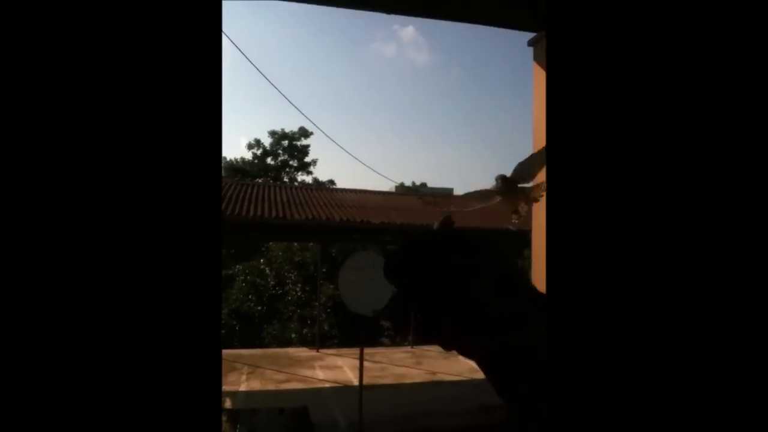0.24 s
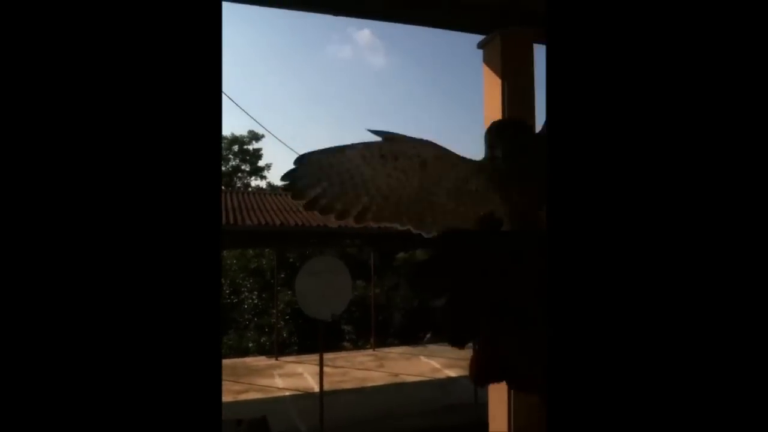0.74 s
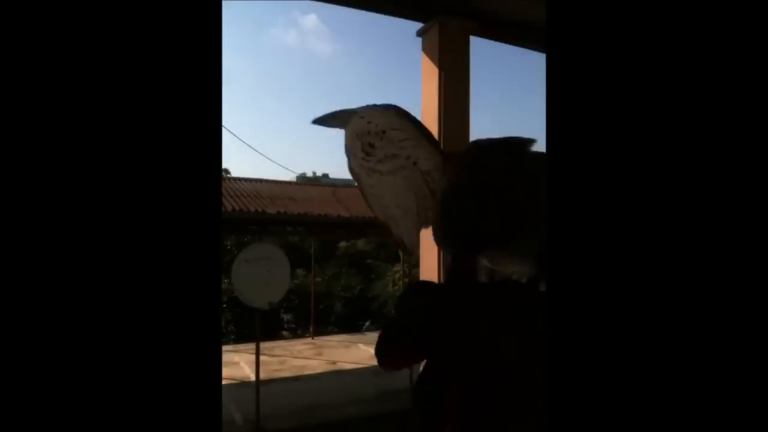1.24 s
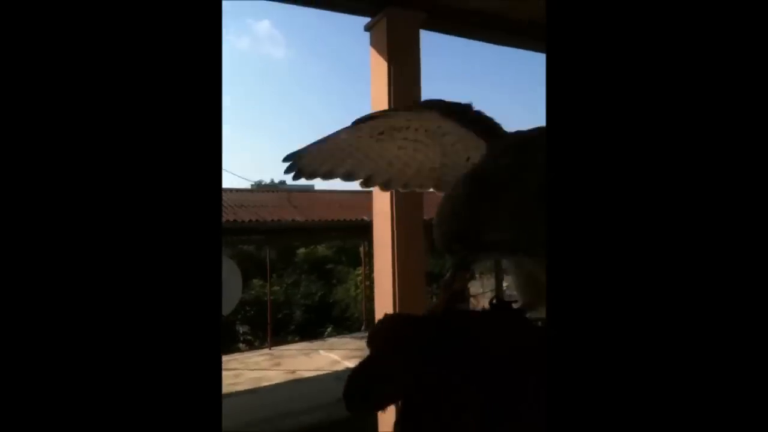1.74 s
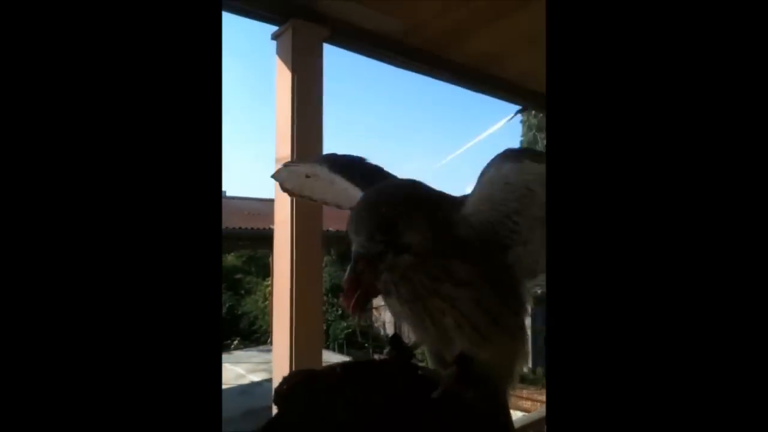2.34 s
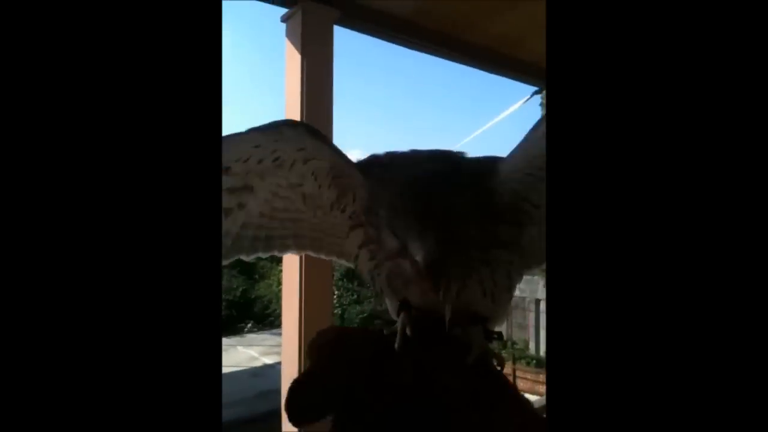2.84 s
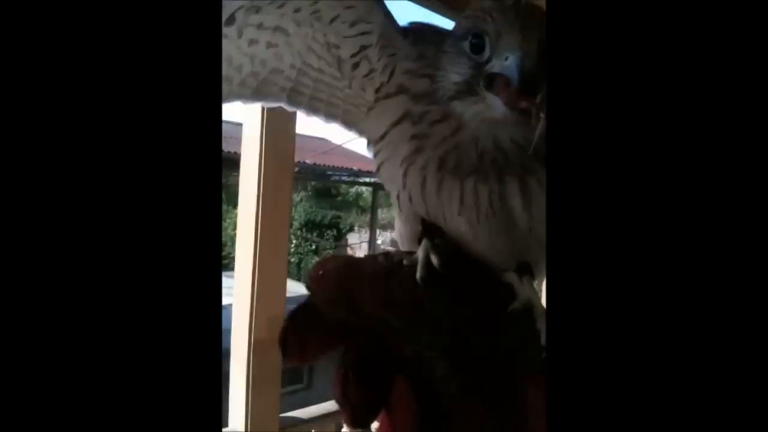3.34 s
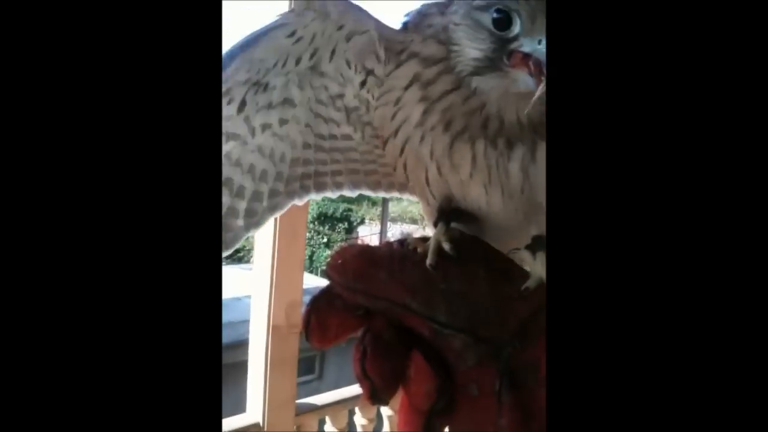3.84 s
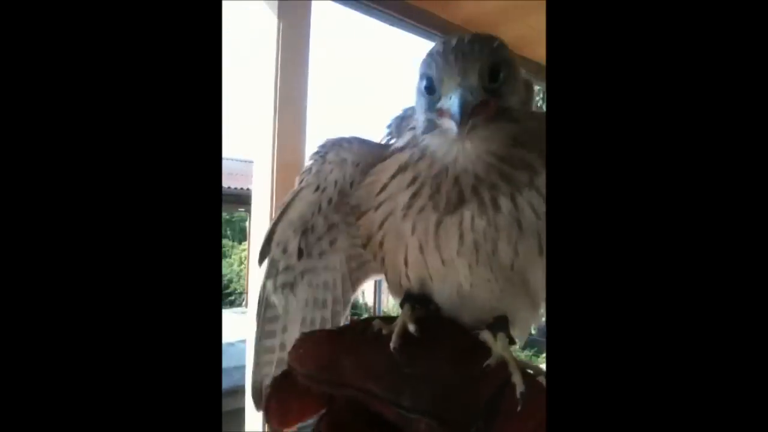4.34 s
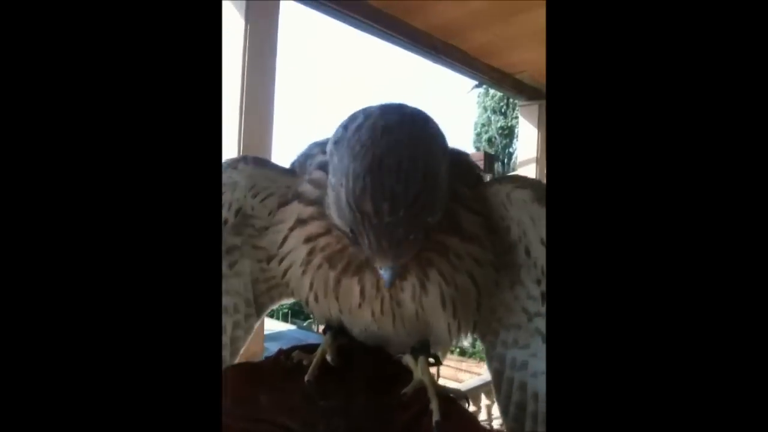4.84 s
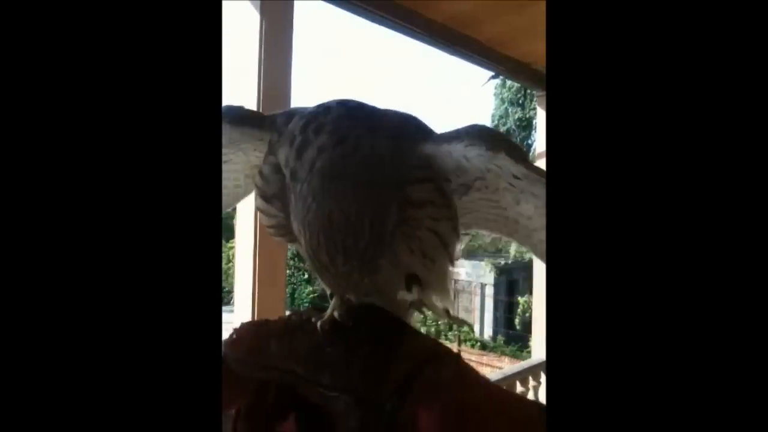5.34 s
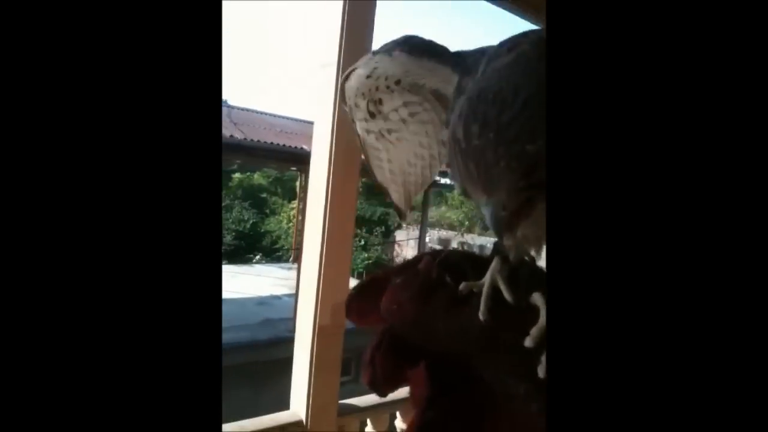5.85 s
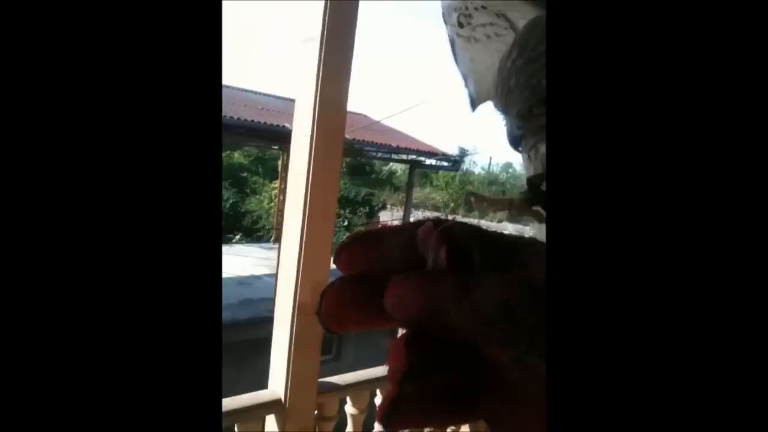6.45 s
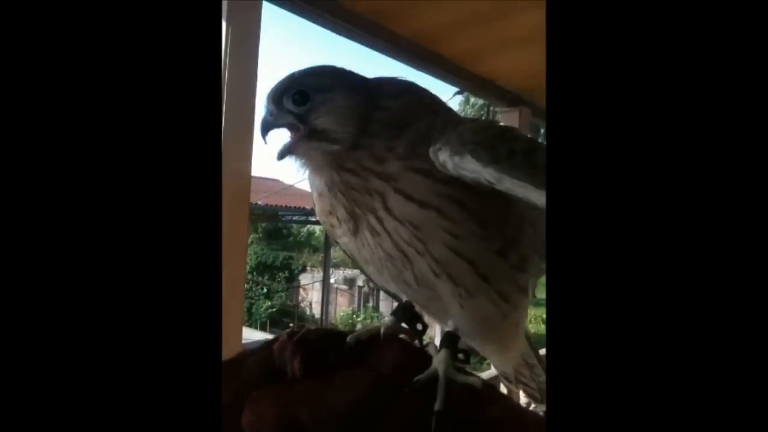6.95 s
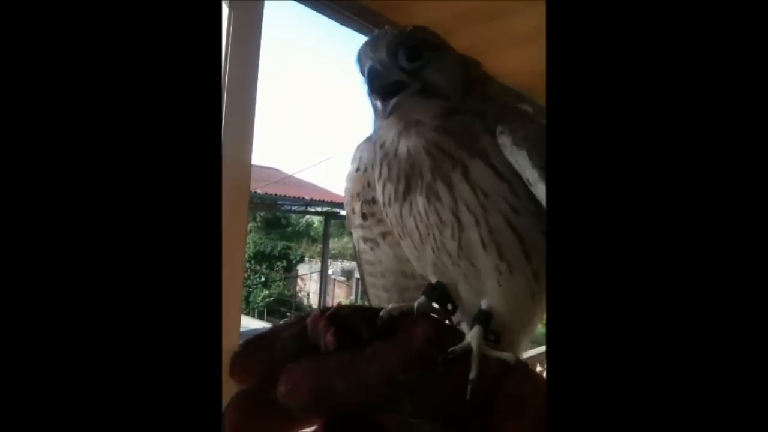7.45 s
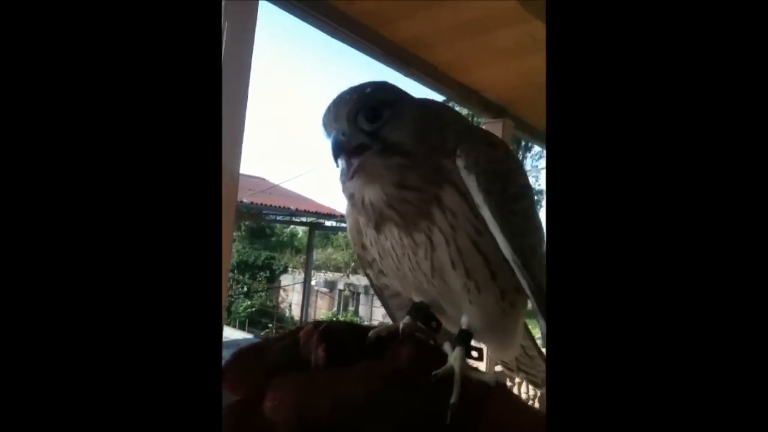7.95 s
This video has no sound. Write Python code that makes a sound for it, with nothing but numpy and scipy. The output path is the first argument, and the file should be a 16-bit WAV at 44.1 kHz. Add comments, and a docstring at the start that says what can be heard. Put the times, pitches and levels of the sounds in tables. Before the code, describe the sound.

From the start a young kestrel calls in quick runs of shrill, raspy yelps, about eighteen to twenty a second, each run lasting a fraction of a second with tiny gaps. The first half second is weaker; from 0.7 to 2.1 s the yelps are loudest, piercing and gritty, dropping in pitch onto each note. From 2.2 to 3.2 s they weaken and roughen, with small ticks near 2.3 and 2.7 s. Then come scattered squeals and thin whines, one brighter yelp at 3.6 s, and low wing thumps on the close microphone, strongest around 3.8 s. Feathers rustle softly. From 4.7 to 7.8 s a faint hoarse call repeats far away roughly every 0.4 s over quiet outdoor air, with low breeze around 5.5 to 6.3 s and sparse faint squeaks, including a falling-away whine at 7.5 s. Sharp, clear, loud yelps burst out from 8.05 s to the end. The porch adds short reflections.

```python
"""Scolding young kestrel

A young kestrel on a gloved hand under a porch roof flaps and scolds in fast shrill runs, then calms to single squeals.
The two sides of its syrinx, a high and a low oscillator, sound together and mix, with a rasp of ragged partials and hiss.
Wing draught is low noise that swells in gusts, feathers rustle as softer noise, beak and talons tick as short bursts,
and a faint hoarse call of shaped noise repeats far away over quiet outdoor air."""
import sys
import numpy as np
from scipy import signal
from scipy.fft import rfft, irfft, next_fast_len
from scipy.io import wavfile

SR = 44100
rng = np.random.default_rng(int(sys.argv[2]) if len(sys.argv) > 2 else 0)


def master_out(mix):
    """Clip the mix to full scale and print it as 16-bit PCM to the path in sys.argv[1]."""
    frames = np.transpose(np.atleast_2d(mix))
    ceiling = np.clip(frames, -1, 1)
    pcm = np.round(ceiling * 32767).astype(np.int16)
    wavfile.write(sys.argv[1], SR, pcm)


N = 361162
T = np.arange(N) / SR  # time in seconds

# Levels of the sources in these tables are relative: filters and trims follow.
# Runs of calling, one push of air each. Each row: start in seconds, end in seconds, whistle in Hz and low voice
# in Hz (both before their bends), effort in dB, strength of the low voice in dB.
CALLING_RUNS = [(-.03, 0.122, 5760, 2383, -41.5, -7.5), (0.192, 0.328, 6170, 2440, -42.5, -8),
                (0.377, 0.603, 6620, 2420, -41, -7), (.647, 1.116, 7180, 2610, -35.5, -7),
                (1.188, 1.49, 7003, 2552, -34.5, -17.5), (1.576, 1.875, 6780, 2578, -38, -31.5),
                (1.969, 2.212, 6824, 2580, -39, -7), (2.3, 2.608, 6280, 2400, -40, -3),
                (2.709, 2.944, 6240, 2248, -45.5, 3.5), (2.976, 3.185, 5633, 2156, -51.5, 6),
                (3.331, 3.437, 8100, 2216, -50.5, 5.5), (3.561, 3.666, 8360, 2660, -50, -3.5),
                (3.812, 3.887, 5570, 2600, -47, -7.5), (4.099, 4.157, 4440, 2227, -45, -21),
                (8.132, 8.214, 6930, 2330, -42, -18)]
# Loud notes that drop from the whistle onto a held pitch. Each row: start in seconds, end in seconds, entry pitch
# in Hz, held pitch in Hz, level in dB, rasp in dB.
YELP_NOTES = [ (0.062, 0.117, 4820, 4826, -36, -0.5), (0.256, .305, 5400, 5040, -32.5, -8),
              (.409, 0.438, 4500, 4620, -37, -14.5), (0.466, 0.516, 4660, 3920, -32.5, -14.5),
              (0.53, 0.559, 5130, 3880, -31, -6.5), (0.555, 0.586, 4500, 4540, -32, -6),
              (.729, 0.754, 5220, 4204, -22, -22), (0.783, 0.813, 5070, 5024, -18, -15),
              (0.84, 0.859, 4810, 4900, -23, -5.5), (0.893, 0.919, 4765, 5140, -21.5, -4.5),
              (0.952, 0.968, 6400, 3956, -16.5, -18), (1.009, 1.034, 5980, 3400, -27.5, -5),
              (1.058, 1.08, 6800, 3996, -13.5, -1), (1.213, 1.244, 5180, 3620, -29.5, -0.5),
              (1.263, 1.294, 6400, 3500, -21.5, -16.5), (1.314, 1.351, 6420, 3464, -21.5, -4.5),
              (1.37, 1.403, 6670, 3420, -21.5, -14), (1.427, 1.458, 7340, 3670, -20, -15.5),
              (1.605, 1.629, 5587, 4325, -26, -11.5), (1.658, 1.681, 7020, 3770, -18.5, -23),
              (1.711, 1.744, 6640, 3653, -21, -17), (1.768, 1.803, 6170, 3480, -22.5, -18),
              (1.824, 1.867, 5910, 3374, -23, -12), (1.994, 2.019, 3780, 3620, -40, -0.5),
              (2.051, 2.082, 5830, 3560, -20, -16), (2.107, 2.13, 4760, 3775, -28, 4),
              (2.439, 2.494, 4310, 4770, -38.5, 2.5), (2.503, 2.53, 5360, 4340, -31, 5),
              (3.574, 3.613, 5340, 5320, -28, -16), (8.063, 8.082, 4390, 4076, -20, -54.5),
              (8.107, 8.144, 4900, 4076, -14.5, -29), (8.167, 8.203, 4600, 4045, -18, -31)]
# Short gliding notes of one voice. Each row: start in seconds, end in seconds, first, middle and last pitch in Hz,
# level in dB, octave in dB before its tilt, rasp in dB.
SQUEAL_NOTES = [ (1.093, 1.119, 4314, 3445, 1410, -29.5, -5, 9),
                (1.467, 1.491, 3705, 2844, 1451, -34, 4, 10.5),
                (1.861, 1.88, 3467, 2452, 1037, -33, -3.5, 3.5),
                (2.176, 2.216, 6200, 5440, 4300, -31, -1, -7),
                (2.585, 2.623, 4810, 4020, 3120, -30, -10.5, -5),
                (2.74, 2.792, 2990, 3083, 2900, -40.5, -12, -5),
                (2.795, 2.865, 4380, 4460, 4570, -43, -16, -27),
                (2.797, 2.83, 1880, 1925, 1974, -43.5, -14, -20),
                (2.898, 2.941, 2826, 2760, 2650, -36, -4, -3.5),
                (3.05, 3.103, 1998, 2238, 2280, -46.5, -1, 0.5),
                (3.106, 3.159, 5400, 4830, 4460, -35, -7, -1),
                (3.148, 3.179, 2500, 2554, 2220, -33.5, -11, -8),
                (3.351, 3.372, 4300, 4100, 3900, -61, 18.5, 10.5),
                (3.427, 3.453, 4400, 4280, 4030, -55.5, 18, -8),
                (3.579, 3.603, 7820, 8050, 7860, -28.5, -30, -23),
                (3.656, 3.685, 4600, 4050, 3300, -54.5, 9, -8),
                (3.892, 3.912, 4460, 3976, 3330, -41.5, -16, -14),
                (3.975, 4.013, 5500, 5660, 5970, -59.5, 5.5, -9.5),
                (4.084, 4.122, 3820, 4160, 4490, -31.5, -9.5, -14.5),
                (4.138, 4.174, 860, 768, 755, -39, -12.5, -15),
                (4.429, 4.464, 3820, 4160, 4130, -54, -28, -14),
                (4.614, 4.674, 3160, 3660, 3570, -49, -14, -26),
                (5.378, 5.413, 1702, 1910, 1696, -44.5, -5.5, -22.5),
                (5.742, 5.83, 1610, 1894, 1906, -57.5, -1, -2),
                (5.806, 5.865, 3940, 4200, 3350, -52, -18, -3.5),
                (6.105, 6.152, 2177, 1943, 2055, -44.5, -4, -20),
                (6.156, 6.171, 3230, 3200, 3150, -57, -24, -30),
                (6.648, 6.67, 1880, 2130, 1925, -45.5, -2, -4),
                (7.604, 7.659, 3820, 4140, 5370, -63.5, -25, -23.5),
                (7.718, 7.747, 4530, 3750, 2590, -66, -21, -16),
                (7.819, 7.834, 5740, 6000, 5950, -49, -36, -24),
                (7.824, 7.869, 4300, 3990, 3400, -66, -22, -17),
                (8.032, 8.041, 1880, 2086, 2100, -46, 3, -15),
                (8.043, 8.074, 5220, 5294, 5230, -31, -14, -26.5),
                (8.079, 8.117, 5500, 5810, 5370, -25.5, -28, -32),
                (8.143, 8.177, 5540, 5580, 5220, -26.5, -28, -12.5)]
# Drawn-out clear whines. Each row: start in seconds, end in seconds, held pitch in Hz, opening overshoot as a share,
# closing rise as a share, level in dB, level change over the note in dB, octave in dB.
WHINE_NOTES = [(3.441, 3.574, 3890, 0.16, 0.39, -46.5, -5, -8),
               (4.01, 4.09, 3210, 0.24, 0.3, -60.5, 12, -10.5),
               (4.474, 4.561, 3203, 0.19, 0.056, -52, 0, -17.5),
               (5.958, 6.044, 2900, 0.15, 0.093, -40, -10, -7), (6.641, 6.693, 3040, .1, 0, -50.5, 4, -9.5),
               (7.449, 7.612, 3510, 0.047, 0.15, -45.5, -13, -16.5)]
# Spectrum of the rasp. Each row: frequency in Hz, level in dB.
RASP_COLOUR = [(900, -5.5), (2000, -6.5), (3200, -7), (4500, 4), (6300, -3.5), (8000, -4), (10000, -10.5),
               (12000, -20.5), (16000, -12.5)]
# Level of the voice's treble, highest while the bird faces the microphone. Each row: time in seconds, gain in dB.
TREBLE_GAIN = [(.5, -5.5), (1.5, -4.5), (3.3, 2.5), (6.2, -2.5), (8.1, -5.5)]
# Beak and talon ticks. Each row: time in seconds, level in dB.
TICK_BLOWS = [(2.3017, -23.5), (2.7125, -23), (3.977, -40), (4.4928, -39), (4.6793, -39), (5.9617, -46),
              (6.6363, -37), (6.7506, -43.5), (7.8163, -40.5), (8.0244, -33)]
# Sound sent to the walls, greatest while the bird is farthest away. Each row: time in seconds, gain in dB.
ECHO_SEND = [(.5, 8), (1.3, -2.5), (2.2, 1), (4, 0)]
# Gusts from the wings on the microphone. Each row: start in seconds, length in seconds, level in dB.
WING_GUSTS = [(2.32, 0.13, -45), (2.67, 0.085, -48.5), (2.79, 0.25, -46.5), (3.06, 0.17, -45.5),
              (3.315, 0.086, -38), (3.59, 0.17, -35.5), (3.812, 0.099, -27), (3.88, 0.23, -41.5),
              (4.64, 0.18, -40.5), (5.485, 0.071, -36), (5.66, 0.12, -52.5), (6.51, 0.078, -46),
              (7.55, 0.083, -43.5)]
# Light breeze between the gusts. Each row: time in seconds, level in dB.
BREEZE_LEVEL = [(0.0, -69), (3.67, -63), (3.81, -41), (4.17, -59), (4.7, -62.5), (5.45, -45), (6.32, -46),
                (7.14, -63.5), (8.19, -46)]
# Spectrum of the air thumping on the microphone. Each row: frequency in Hz, level in dB.
BUFFET_COLOUR = [(18, -70), (30, -38), (54, -31), (121, -3), (167, 2.5), (282, -5), (526, -22.5),
                 (1500, -48.5), (1950, -73), (3300, -120)]
# Spells of feathers sliding over each other. Each row: start in seconds, length in seconds, level in dB.
FEATHER_RUSTLES = [(-0.7, 5.8, -62), (5.55, 0.88, -66.5), (5.5, 0.74, -65), (6.7, 0.18, -65.5)]
# Onsets of the distant calls. Each entry: time in seconds.
FAR_CALL_TIMES = [4.70, 5.12, 5.50, 5.87, 6.248, 6.62, 7.00, 7.38, 7.748]
# Spectrum of the distant call. Each row: frequency in Hz, level in dB.
FAR_CALL_COLOUR = [(400, -51), (680, -20), (830, 4.5), (1000, -17), (1200, -8.5), (1600, -15.5),
                   (2200, -22.5), (2800, -53), (5000, -43)]
# Spectrum of the outdoor air. Each row: frequency in Hz, level in dB.
YARD_COLOUR = [(30, -36), (60, -25.5), (150, -7), (600, -13), (820, -7), (2000, -16), (3000, -37.5),
               (6500, -31), (8080, -22), (10000, -55.5), (16000, -47.5)]

SCOOP, SCOOP_S = 0.42, 0.011  # a run starts flat by this share and closes in with this time constant
SLUMP, SLUMP_S = 0.37, 0.019  # it falls by this share, with this time constant, as the air runs out
SURGE_DB, SURGE_SAG = 6.5, 0.15  # each yelp swells the effort and pulls the whistle down by this share
RECOVER_S = 0.012  # then both recover in this time
LOW_BEND = 0.36  # exponent: how far the low voice follows scoop and slump
THROB_HZ, THROB_DB = 19.2, 2  # the air comes in quick pushes, counted from the start of each run
SPLIT_HZ = 1340  # a pressed yelp splits into a whole fraction of its pitch near this one
GUST_ATTACK, GUST_RELEASE = 0.3, 0.64  # shares of a gust's or rustle's length
STILL_FEATHERS_DB = -74.5
YARD_DB = -66.5
TOP_HZ = 15850


def undb(db):
    """Decibels to gain."""
    return 10 ** (np.asarray(db) / 20)


def over_time(points):
    """Straight lines through (time, value) points."""
    return np.interp(T, *np.transpose(points))


def noise(colour):
    """Noise of rms 1 with a spectrum of (Hz, dB) points."""
    hz, db = np.transpose(colour)
    size = next_fast_len(N)
    bins = np.maximum(np.arange(size // 2 + 1) * SR / size, 1)
    gain = undb(np.interp(np.log(bins), np.log(hz), db))
    x = irfft(rfft(rng.standard_normal(size)) * gain, size)[:N]
    return x / x.std()


def walk(rate):
    """Smooth chance of spread 1 that heads for a new random value rate times a second."""
    x = np.interp(T * rate, np.arange(N // 4), rng.standard_normal(N // 4))
    return x / x.std()


def turn(hz):
    """Phase of an oscillator that follows a pitch curve."""
    return 2 * np.pi * np.cumsum(hz) / SR


def span(start, end, attack, release):
    """Samples of a note, its progress 0-1 and its swell; attack and release are shares of its length."""
    i = np.flatnonzero((T >= start) & (T < end))
    u = (T[i] - start) / (end - start)
    rise = np.sin(np.pi / 2 * np.minimum(u / attack, 1)) ** 2
    fall = np.sin(np.pi / 2 * np.minimum((1 - u) / release, 1)) ** 2
    return i, u, rise * fall


def kestrel(throat_hz=1600, beam_hz=8500):
    """All of the voice, through a short throat that radiates little bass and beams its treble forward."""
    low_hz = low_pitch()
    rasp = chaos(low_hz)
    shaky_hz = low_hz * (1 + 0.033 * walk(900))
    voice = runs(shaky_hz, rasp) + yelps(shaky_hz, rasp) + squeals(rasp) + whines()
    beam = signal.butter(2, beam_hz, "high", fs=SR, output="sos")
    treble = signal.sosfiltfilt(beam, voice)
    voice = voice + (undb(over_time(TREBLE_GAIN)) - 1) * treble
    throat = signal.butter(2, throat_hz, "high", fs=SR, output="sos")
    return signal.sosfilt(throat, voice)


def runs(low_hz, rasp, whistle_db=-7.0, rasp_db=-3, whistle_jitter=0.029, flicker_db=5.5, low_flicker_db=6.0):
    """Air flows through a whole run: a thin unsteady whistle, the low voice and rasp all follow the effort."""
    out = np.zeros(N)
    shake = 1 + whistle_jitter * walk(1200)
    surge = pressure()
    low = undb(low_flicker_db * walk(110) - 5.5) * membrane(low_hz, [-6])
    whistle_gain = undb(whistle_db + flicker_db * walk(240))
    for start, end, whistle_hz, _, db, low_db in CALLING_RUNS:
        i, _, swell = span(start, end, 0.012, 0.11)
        sag = 1 - SURGE_SAG * surge[i]
        whistle = membrane(whistle_hz * arch(T[i], start, end) * sag * shake[i], [-22])
        throb = THROB_DB * np.cos(2 * np.pi * THROB_HZ * (T[i] - start))
        effort = undb(db + throb + SURGE_DB * surge[i])
        sound = whistle_gain[i] * whistle + undb(low_db) * low[i] + undb(rasp_db) * rasp[i]
        out[i] += swell * effort * sound
    return out


def yelps(low_hz, rasp, lead_s=0.003, linger_s=0.0023, drop_s=0.008, lift=0.07, jitter=0.041,
          mixing=0.21, low_share=0.098, rasp_share=0.11, split_share=0.52, brightening=0.24):
    """The high voice falls onto its pitch and lifts at the end; the low voice chops it into sum and difference tones."""
    out, shake = np.zeros(N), walk(1500)
    low, chop = membrane(low_hz, [-2]), np.cos(turn(low_hz))
    for start, end, entry_hz, held_hz, db, rasp_db in YELP_NOTES:
        opens = start - lead_s  # the beak opens just ahead of the note
        i, u, swell = span(opens, end + linger_s, 0.42, 0.5)
        rough = undb(rasp_db)
        drop = np.exp(-((T[i] - opens) / drop_s) ** 2.0)
        hz = held_hz * (1 + lift * u ** 3) + (entry_hz - held_hz) * drop
        swell = swell * (held_hz / hz) ** 0.68  # quieter above the held pitch, louder below it
        # the cleanest notes have weaker overtones
        overtones_db = np.array([-8, -20, -27]) + brightening * min(rasp_db + 15, 0)
        high = membrane(hz * (1 + jitter * rough * shake[i]), overtones_db)
        grit = mixing * high * chop[i] + low_share * low[i] + rasp_share * rasp[i]
        grit = grit + split_share * subharmonics(hz, held_hz)
        out[i] += undb(db) * swell * (high + rough * grit)
    return out


def squeals(rasp, jitter=0.019):
    """One voice glides along an arc; raspy notes shake more, and overtones weaken the higher they lie."""
    out, shake = np.zeros(N), walk(1200)
    for start, end, first_hz, middle_hz, last_hz, db, octave_db, rasp_db in SQUEAL_NOTES:
        i, u, swell = span(start, end, 0.12, 0.3324)
        arc = np.polyfit([0, 0.5, 1], [first_hz, middle_hz, last_hz], 2)
        hz = np.polyval(arc, u)
        overtones_db = octave_db - 3.8 * middle_hz / 1000 * np.arange(5)
        voice = membrane(hz * (1 + jitter * undb(rasp_db) * shake[i]), overtones_db)
        out[i] += undb(db) * swell * (voice + undb(rasp_db) * rasp[i])
    return out


def whines(peak_s=0.019, width_s=0.013, late=4.5, jitter=0.0049, overtone_step_db=-6):
    """A clear voice overshoots, settles on its pitch and, where the table asks, climbs as the note closes."""
    out, shake = np.zeros(N), 1 + jitter * walk(700)
    for start, end, held_hz, overshoot, rise, db, fade_db, octave_db in WHINE_NOTES:
        i, u, swell = span(start, end, 0.08, 0.21)
        bump = np.exp(-((T[i] - start - peak_s) / width_s) ** 2)
        hz = held_hz * (1 + overshoot * bump + rise * u ** late)
        voice = membrane(hz * shake[i], octave_db + overtone_step_db * np.arange(4))
        out[i] += undb(db + fade_db * u) * swell * voice
    return out


def membrane(hz, overtones_db):
    """A vibrating syrinx membrane: fundamental of rms 1 and overtones, all fading out towards the top of hearing."""
    phase, total = turn(hz), 0
    for k, db in enumerate([0, *overtones_db], 1):
        fade = np.clip((SR * 0.45 - k * hz) / 2000, 0, 1)
        total = total + undb(db) * np.sin(k * phase) * fade
    return np.sqrt(2) * total


def low_pitch(rest_hz=2300, stray=0.045):
    """The low voice holds one pitch for each run, bends a little with its arch and strays more the harder it is driven."""
    hz, drift = np.full(N, 1. * rest_hz), np.tanh(walk(35))
    for start, end, _, low_hz, _, low_db in CALLING_RUNS:
        i = (T >= start) & (T < end)
        straying = 1 + stray * undb(min(low_db, 0)) ** 2 * drift[i]
        hz[i] = low_hz * arch(T[i], start, end) ** LOW_BEND * straying
    return hz


def arch(t, start, end):
    """Pitch of a run as a share of its full height: it scoops up, holds and slumps."""
    scoop = 1 - SCOOP * np.exp((start - t) / SCOOP_S)
    slump = 1 - SLUMP * np.exp((t - end) / SLUMP_S)
    return scoop * slump


def pressure():
    """How far the yelps have pushed the air pressure up, 0-1: it builds through each yelp and ebbs after it."""
    pushes = [np.interp(T, [start, end, end + RECOVER_S], [0, 1, 0]) for start, end, *_ in YELP_NOTES]
    return np.max(pushes, axis=0)


def chaos(low_hz, wander_hz=185, flicker_db=7.0, hiss_db=-11.5):
    """Overdriven membranes break into ragged partials at half multiples of the low voice, each wavering and flaring alone."""
    points_hz, points_db = np.transpose(RASP_COLOUR)
    out = 0
    for k in np.arange(2, 15):
        hz = k * low_hz / 2 + wander_hz * (walk(130) + walk(1000))
        level_db = np.interp(hz, points_hz, points_db) + flicker_db * walk(170)
        out = out + undb(level_db) * np.sin(turn(hz))
    return out / out.std() + undb(hiss_db) * noise(RASP_COLOUR)


def subharmonics(hz, held_hz, tilt_db=2.5):
    """Both voices lock together: a stack of rms 1 on a fraction of the high pitch, shaped like the rasp."""
    points_hz, points_db = np.transpose(RASP_COLOUR)
    parts = np.round(held_hz / SPLIT_HZ)
    k = np.arange(1, 12)
    db = np.interp(k * held_hz / parts, points_hz, points_db) + tilt_db * k
    db = db + 3 * rng.standard_normal(len(k))  # no two notes share a colour
    stack = membrane(hz / parts, db[1:] - db[0])
    return stack / stack.std()


def ticks(decay_s=0.003, db=-9):
    """Dry clicks of beak and talons: noise bursts that jump up and die away exponentially."""
    blows = np.zeros(N)
    for s, blow_db in TICK_BLOWS:
        blows[int(s * SR)] = undb(blow_db + db)
    envelope = signal.lfilter([1], [1, -np.exp(-1 / (decay_s * SR))], blows)
    return envelope * noise([(300, -22), (1500, 10.0), (4500, 8), (8000, -40), (15000, -21)])


def wings(draught_db=-1, flutter_db=4.0, breeze_db=3):
    """Moving air thumps on the microphone, brighter in the strongest gusts, while feathers rustle."""
    gust_db = puffs(WING_GUSTS, over_time(BREEZE_LEVEL) + breeze_db)
    eddies = noise([(100, -20.0), (300, 7), (600, -11.0), (1200, -18.0), (4000, -36.0), (12000, -46.5)])
    eddy_db = np.interp(gust_db, [-65, -42, -32], [-100, -56, -39])  # eddies only break off in strong gusts
    buffet = undb(gust_db + draught_db) * noise(BUFFET_COLOUR) + undb(eddy_db) * eddies
    feathers = noise([(200, 2), (1200, 2.0), (4000, -4.5), (9000, -13.5), (16000, -10.5)])
    rustle_db = puffs(FEATHER_RUSTLES, STILL_FEATHERS_DB) + 2.5 * walk(90)
    return buffet * undb(flutter_db * walk(50)) + feathers * undb(rustle_db)


def puffs(table, rest_db):
    """Level in dB of movements that swell and die away above a resting level, summed as power."""
    power = np.zeros(N) + undb(rest_db) ** 2
    for start, length, db in table:
        i, _, swell = span(start, start + length, GUST_ATTACK, GUST_RELEASE)
        power[i] += (undb(db) * swell) ** 2
    return 10 * np.log10(power)


def porch(dry, t60_s=0.25, near_t60_s=0.06, wet_db=-14, near_db=-17):
    """Dense early reflections from roof and posts, and a thin longer tail from the house walls."""
    t = T[:SR * 3 // 4]
    decays = undb(-60 * t / np.array([[t60_s], [near_t60_s]]))
    tail, near = rng.standard_normal((2, len(t))) * (t > 0.004) * decays
    response = undb(wet_db) * tail / np.linalg.norm(tail) + undb(near_db) * near / np.linalg.norm(near)
    response = signal.sosfilt(signal.butter(1, 8000, fs=SR, output="sos"), response)
    return dry + signal.fftconvolve(dry * undb(over_time(ECHO_SEND)), response)[:N]


def yard(rise_s=0.035, call_db=-60):
    """Quiet outdoor air, with a hoarse call that repeats far off, smeared by the distance."""
    calls = np.zeros(N)
    for s in FAR_CALL_TIMES:
        age = np.maximum(T - s, 0) / rise_s
        calls += undb(call_db) * age * np.exp(1 - age)
    air = undb(YARD_DB + 1.2 * walk(2.0)) * noise(YARD_COLOUR)
    return calls * noise(FAR_CALL_COLOUR) + air


def scene():
    """The bird close by under the roof, the yard behind it."""
    return (porch(kestrel() + ticks()) + wings() + yard())[None]


def record(dry):
    """The phone cuts the top with a steep low-pass."""
    return signal.sosfilt(signal.ellip(10, 0.2, 70, TOP_HZ, fs=SR, output="sos"), dry)


dry = scene()
out = record(dry)
master_out(out)
```